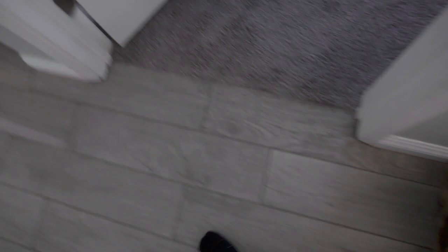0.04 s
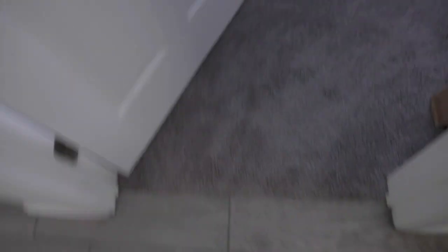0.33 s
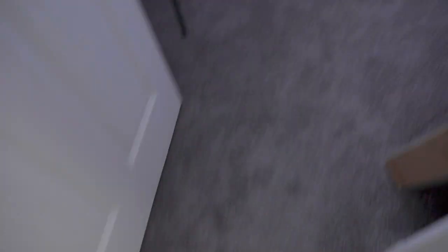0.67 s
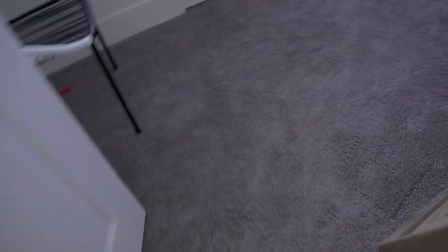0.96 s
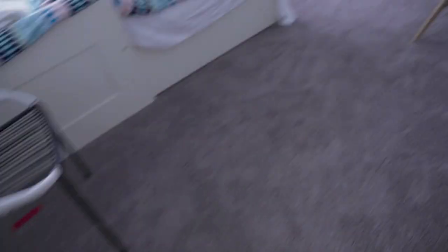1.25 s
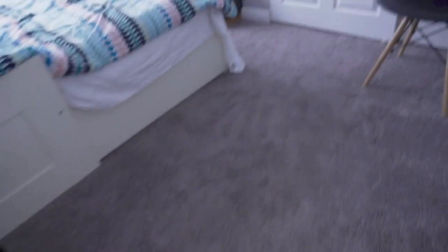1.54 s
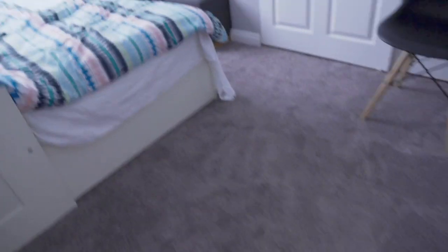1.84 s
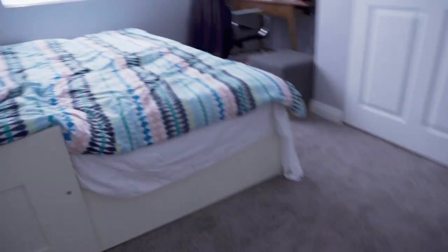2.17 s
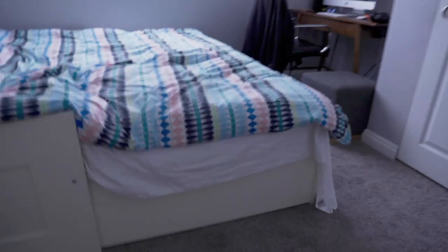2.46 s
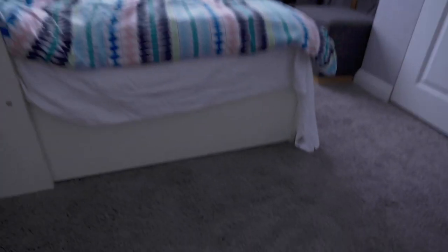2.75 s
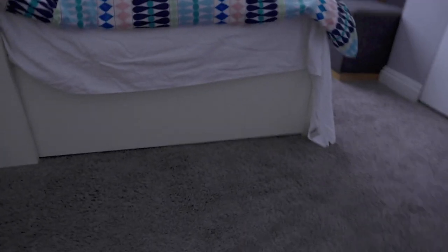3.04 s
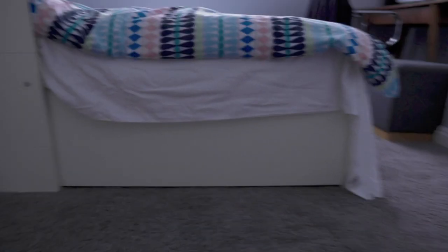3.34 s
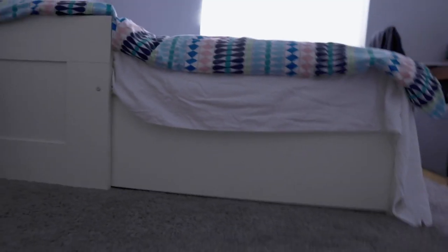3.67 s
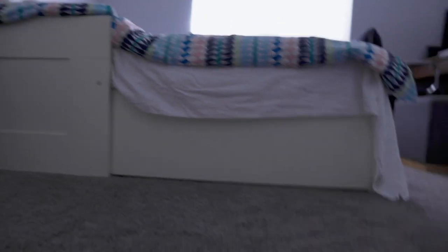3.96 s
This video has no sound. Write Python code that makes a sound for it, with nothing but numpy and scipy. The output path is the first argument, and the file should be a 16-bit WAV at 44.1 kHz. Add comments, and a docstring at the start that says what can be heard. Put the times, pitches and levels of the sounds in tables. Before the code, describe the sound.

Muffled steps thud across a carpeted floor, with rustling clothes, handling bumps and two knocks.

```python
"""A microphone switches on with a soft pop over quiet room tone, and the hand-held camera starts to
rumble, shudder and bump. Cloth slides close by as someone carries it across a carpeted bedroom:
soft footfalls make the floor boom, the grip ticks, clothing swishes and rustles between the steps.
At 1.6 s a sharp knock rings briefly in the room; a louder, brighter one follows at 2.9 s.
The last second is busy with handling ticks and more steps."""
import sys
import numpy as np
from scipy import signal
from scipy.fft import rfft, irfft
from scipy.io import wavfile

SR = 44100
rng = np.random.default_rng(int(sys.argv[2]) if len(sys.argv) > 2 else 0)


def wav_out(sig):
    """Save sig, one row per channel (or a flat mono array), as 16-bit PCM at SR to the path in sys.argv[1]."""
    wavfile.write(sys.argv[1], SR, np.round(np.clip(np.atleast_2d(sig).T, -1, 1) * 32767).astype(np.int16))


N = 176400
TIME = np.arange(N) / SR

# the bedroom's quiet air: pitch_hz, density_db
ROOM_TONE_COLOUR = [(25, 4), (45, 3.5), (65, -4.5), (100, -27), (160, -40), (240, -13.5), (320, -32),
                    (500, -32), (1000, -29), (2100, -32), (3000, -38), (6000, -39.5), (9000, -44),
                    (13000, -49.5), (16000, -51)]
# sway of the carried camera: time_s, level_db
SWAY_LEVEL = [(.08, -30), (.19, -37), (.38, -32), (.9, -36), (1.36, -39), (1.5, -28), (2.14, -33),
              (2.28, -24), (2.51, -32), (2.63, -22), (2.74, -26), (2.86, -18), (3.25, -24), (3.6, -26),
              (3.72, -31), (3.92, -25), (4, -29)]
# its deep rumble: pitch_hz, density_db
RUMBLE_COLOUR = [(11, -1), (15, 0), (22, -8), (33, -12), (45, -15), (55, -20), (70, -36)]
# fader ride of the shudder in the grip: time_s, level_db
SHUDDER_LEVEL = [(.08, -35), (.2, -40.5), (.36, -45), (.85, -55), (1.35, -45.5), (1.6, -35.5), (1.92, -40),
                 (2.05, -47), (2.3, -32), (2.7, -32.5), (3.05, -30.5), (3.26, -38.5), (3.55, -38.5),
                 (4, -30)]
# its low tone: pitch_hz, density_db
SHUDDER_COLOUR = [(40, 1), (58, 4), (72, 6), (85, -17.5), (102, -4.5), (130, -21.5), (165, -24), (205, -22),
                  (245, -24), (290, -27), (400, -33.5), (700, -52.5)]
# the hand bumps the camera: start_s, level_db
BUMPS = [(.072, -37), (.128, -43), (.16, -43.5), (.305, -45.5), (.48, -47), (.532, -40.5), (.76, -49.5),
         (.93, -49.5), (2.15, -46.5), (2.695, -42), (2.955, -42), (3.362, -39.5), (3.622, -41.5),
         (3.83, -45)]
# dull puff of a bump or step: pitch_hz, density_db
THUD_COLOUR = [(50, -18), (110, -4.5), (160, -2.5), (205, -5), (245, 2.5), (320, -28.5), (450, -22),
               (750, -22.5), (1500, -59), (4000, -37)]
# its hollow ring: pitch_hz, level_db, t60_s
HOLLOW_MODES = [(211.7, -5, 0.25), (247.3, -3, 0.22), (293, -5.5, .08)]
# cloth slides near the microphone: peak_s, level_db, rise_s, fall_s
SLIDES = [(.1, -59, 0.01, 0.021), (.28, -62.5, 0.028, 0.036), (.48, -67, 0.093, 0.15),
          (.599, -56.5, 0.014, 0.0097), (.945, -55, 0.037, 0.033), (1.23, -69.5, 0.35, 0.063),
          (1.39, -66.5, 0.048, 0.027), (1.56, -72.5, .04, .24), (2.05, -71, .03, 0.03),
          (2.68, -69, 0.018, 0.076), (3.46, -53.5, 0.081, 0.048), (3.68, -61.5, .14, 0.12),
          (3.87, -62.5, 0.096, 0.085)]
# their bright hiss: pitch_hz, density_db
SLIDE_COLOUR = [(1000, 0), (2800, 2), (3800, 4), (4700, 2), (7500, 4), (10000, 2), (13000, -4),
                (16000, -6.5)]
# feet load the floor: start_s, boom_db, thud_db
STEPS = [(0.231, -23.5, -52.5), (0.55, -21.5, -38), (0.686, -30.5, -42), (1.446, -31, -65),
         (1.584, -15.5, -34), (1.724, -22.5, -56), (2.282, -16.5, -47), (2.532, -26.5, -71),
         (2.805, -22, -47.5), (3.082, -13.5, -36.5), (3.658, -28, -56), (3.769, -24.5, -39),
         (3.887, -30, -45.5)]
# the floor's boom: pitch_hz, level_db, decay_s
FLOOR_MODES = [(49.5, -8.5, 0.15), (64.3, 0.5, .16), (95.3, -6.5, 0.093), (115.8, -15, 0.11)]
# small handling ticks: start_s, bright_db, dull_db
TICKS = [(0.53, -50, -54), (0.54, -45, -48.5), (0.555, -54, -48.5), (0.69, -74, -52), (3.061, -55, -43),
         (3.177, -56, -57), (3.221, -50, -67), (3.253, -46, -60), (3.324, -49.5, -45.5), (3.339, -47, -54),
         (3.362, -39.5, -52), (3.639, -42, -45), (3.771, -66, -38), (3.774, -40, -42.5), (3.884, -43, -43),
         (3.926, -45, -48)]
# a tick's bright edge: pitch_hz, density_db
TICK_BRIGHT_COLOUR = [(2000, 6), (4000, -4), (5500, -3), (7300, -0.5), (10000, -5.5), (16000, -18)]
# a tick's dull body: pitch_hz, density_db
TICK_DULL_COLOUR = [(300, 18), (750, 6.5), (1400, 12), (2000, -2.5), (3000, -4.5), (7000, -65)]
# trouser legs and soles brush past: peak_s, level_db, rise_s, fall_s
SWISHES = [(.94, -50.5, 0.018, 0.025), (1.24, -61, 0.45, 0.053), (1.44, -51.5, 0.081, 0.038),
           (1.545, -49, 0.039, 0.056), (1.755, -52.5, 0.06, 0.042), (1.98, -55, 0.043, 0.049),
           (2.045, -50.5, 0.027, 0.052), (2.22, -60, 0.087, 0.15), (2.675, -48.5, 0.063, 0.033),
           (3.05, -57, 0.57, 0.23), (3.37, -58.5, 0.044, 0.18), (3.82, -60, 0.18, 0.16)]
# their soft, broad tone: pitch_hz, density_db
SWISH_COLOUR = [(200, 7), (400, 8.5), (750, 4.5), (1500, -1), (2200, -3.5), (3200, -9), (5000, -24),
                (9000, -26.5), (16000, -50)]
# fabric zips and soles scuff: peak_s, level_db, rise_s, fall_s, pitch_hz, half_width_octaves
RUSTLES = [(.94, -51.5, 0.031, 0.034, 1300, 0.43), (.945, -71, 0.029, 0.045, 8900, 0.12),
           (1.25, -66.5, 0.08, 0.057, 4170, 0.46), (1.365, -53.5, 0.016, 0.025, 2600, .3),
           (1.405, -60.5, 0.029, 0.047, 5100, 0.29), (1.45, -55.5, 0.019, 0.067, 600, 0.55),
           (1.539, -48.5, 0.02, 0.039, 860, 0.79), (1.68, -67.5, 0.3, 0.11, 3300, 0.63),
           (2.025, -51, 0.015, .04, 1270, 0.37), (2.06, -65, 0.034, 0.053, 3700, 0.43),
           (2.31, -68, 0.015, 0.028, 4120, 0.13), (2.66, -54, 0.064, 0.056, 1090, 0.57),
           (3.05, -67.5, 0.21, 0.15, 4300, 0.24), (3.46, -64, 0.12, .1, 3900, 0.18),
           (3.48, -60, .06, 0.053, 6800, 0.23)]
# sharp knocks: start_s, level_db, most_excited_hz, rolloff_db_per_octave
KNOCKS = [(1.5891, -38, 2500, 8.5), (2.8712, -27, 2380, 0.7)]
# what the knocks ring with: pitch_hz, level_db, t60_s
KNOCK_MODES = [(725, -6, .02), (1276, -7, .083), (1522, -2, .031), (1717, -15, .09), (1895, 2, .023),
               (2058, 6, .013), (2329, -9, .029), (2591, -5, .056), (2794, 4, .012), (2916, 4, .025),
               (3237, -2, .03), (3599, -6, .012), (4221, -16, .03), (4560, -13, .02)]
# a knock's crack: pitch_hz, density_db
CRACK_COLOUR = [(4500, 6), (8000, -10.5), (11000, -33), (16000, -30)]
# the room's answer: pitch_hz, density_db
ECHO_COLOUR = [(400, 8), (1300, 3), (2000, 9.5), (2400, 4), (3000, 5), (3900, -4.5), (4600, -4.5),
               (5400, -7.5), (7000, -18), (14000, -26)]

THUD_RISE_S, SNAP_RISE_S = 0.0013, 0.00013


def from_db(db):
    """Decibels to gain."""
    return 10 ** (np.asarray(db) / 20)


def rms_one(x):
    """Scale to unit power."""
    return x / np.sqrt(np.mean(x ** 2) + 1e-20)


def noise(colour):
    """Unit noise of a given colour, falling away steeply past both ends."""
    hz, db = np.transpose(colour)
    f = np.maximum(np.arange(N // 2 + 1) * SR / N, 1)
    gain = from_db(np.interp(np.log(f), np.log(hz), db))
    skirts = (1 + (hz[0] / f / 1.5) ** 4) * (1 + (f / hz[-1] / 1.5) ** 4)
    return rms_one(irfft(rfft(rng.standard_normal(N)) * gain / skirts, N))


def drift(hz):
    """Smooth random wander of spread 1."""
    f = np.arange(N // 2 + 1) * SR / N
    return rms_one(irfft(rfft(rng.standard_normal(N)) / (1 + (f / hz) ** 2), N))


def ring(push, hz, t60_s):
    """A unit click sets a sine of height 1 ringing."""
    r, w = from_db(-60 / (t60_s * SR)), 2 * np.pi * hz / SR
    return signal.lfilter([0, np.sin(w)], [1, -2 * r * np.cos(w), r * r], push + 1e-18)


def clicks(rows):
    """One impulse for each start_s, level_db."""
    start_s, db = np.transpose(rows)
    return np.bincount((start_s * SR).astype(int), from_db(db), N)[:N]


def bursts(rows, rise_s, t60_s):
    """Envelope of blows: a quick attack, then an even decay."""
    power = 0
    for start_s, db in rows:
        age = np.maximum(TIME - start_s, 0)
        attack = 1 - np.exp(-age / rise_s)
        decay = from_db(db - 60 * np.minimum(age / t60_s, 3))
        power += (attack * decay) ** 2
    return np.sqrt(power)


def swell(peak_s, db, rise_s, fall_s, squareness=2.1):
    """Gain of one stroke, which grows, holds briefly and fades."""
    from_peak = np.abs(TIME - peak_s) / np.where(TIME < peak_s, rise_s, fall_s)
    return from_db(db) * np.exp(-.5 * np.minimum(from_peak, 6) ** squareness)


def room_tone(level_db=-49.5):
    """A steady, bass-heavy bed of air."""
    return from_db(level_db) * noise(ROOM_TONE_COLOUR)


def camera_rumble():
    """The carried camera rumbles as it sways, and shudders in the grip."""
    sway = noise(RUMBLE_COLOUR) * from_db(np.interp(TIME, *np.transpose(SWAY_LEVEL)))
    shudder = noise(SHUDDER_COLOUR) * from_db(np.interp(TIME, *np.transpose(SHUDDER_LEVEL)))
    return sway + shudder


def thuds(rows, puff_t60_s, puff_db=-1, hollow_db=-1.5):
    """Dull blows of hand or foot: a puff of low noise and a short hollow ring."""
    blow = clicks(rows)
    hollow = sum(from_db(hollow_db + db) * ring(blow, hz, t60_s) for hz, db, t60_s in HOLLOW_MODES)
    puff = from_db(puff_db) * noise(THUD_COLOUR) * bursts(rows, THUD_RISE_S, puff_t60_s)
    return hollow + puff


def cloth_rub(strokes, colour, grain_db=1.7, grain_hz=150):
    """Rubbing that swells with each stroke, grainy from catching fibres."""
    power = sum(swell(*stroke) ** 2 for stroke in strokes)
    friction = noise(colour) * from_db(grain_db * drift(grain_hz))
    return np.sqrt(power) * rms_one(friction)


def footsteps(contact_s=0.0024, boom_db=1.5):
    """A cushioned push sets the floor booming, together with a dull thud."""
    steps, age = np.array(STEPS), TIME[:SR // 2]
    cushion = age * np.exp(-2 * age / contact_s)
    push = signal.fftconvolve(clicks(steps[:, :2]), cushion / cushion.sum())[:N]
    floor = 0
    for hz, db, decay_s in FLOOR_MODES:
        damping = np.log(1000) * age / decay_s
        bloom = damping * np.exp(1 - damping)   # builds over a cycle or two, then dies
        floor += from_db(db) * bloom * np.sin(2 * np.pi * hz * age)
    boom = from_db(boom_db) * signal.fftconvolve(push, floor)[:N]
    return boom + thuds(steps[:, [0, 2]], puff_t60_s=0.2)


def handling_ticks():
    """The grip ticks on the camera: a bright edge over a longer, dull body."""
    ticks = np.array(TICKS)
    bright = noise(TICK_BRIGHT_COLOUR) * bursts(ticks[:, :2], SNAP_RISE_S, t60_s=0.019)
    dull = noise(TICK_DULL_COLOUR) * bursts(ticks[:, [0, 2]], SNAP_RISE_S, t60_s=0.036)
    return bright + dull


def rustles():
    """Weave running over weave gives a band of noise for each stroke."""
    out = 0
    for *stroke, hz, octaves in RUSTLES:
        edges_hz = [hz / 2 ** octaves, min(hz * 2 ** octaves, SR / 2 - 1)]
        band = signal.butter(2, edges_hz, "band", fs=SR, output="sos")
        out += swell(*stroke) * rms_one(signal.sosfilt(band, rng.standard_normal(N)))
    return out


def knocks(crack_db=-13.5, echo_db=-15):
    """Each blow gives a short crack, a ringing body and the room's dying answer."""
    hits, body = np.array(KNOCKS)[:, :2], 0
    for k, (hz, mode_db, t60_s) in enumerate(KNOCK_MODES):
        blow = clicks([(start_s, db + mode_db - rolloff * abs(np.log2(hz / excited_hz)))
                       for start_s, db, excited_hz, rolloff in KNOCKS])
        body += (-1) ** k * ring(blow, hz, t60_s)   # modes alternate in polarity
    crack = from_db(crack_db) * noise(CRACK_COLOUR) * bursts(hits, SNAP_RISE_S, t60_s=0.034)
    echo = from_db(echo_db) * noise(ECHO_COLOUR) * bursts(hits, rise_s=0.005, t60_s=0.39)
    return body + crack + echo


def scene():
    """Steps, clothing, knocks, handling and room tone in one mono mix."""
    mix = footsteps()
    mix += cloth_rub(SWISHES, SWISH_COLOUR) + cloth_rub(SLIDES, SLIDE_COLOUR) + rustles()
    mix += knocks()
    mix += camera_rumble() + thuds(BUMPS, puff_t60_s=0.23) + handling_ticks()
    return (mix + room_tone())[None]


def record(dry, switch_on_s=0.0696, fade_in_s=0.004, pop_db=-20.5, pop_fall_s=0.014, cutoff_hz=15700):
    """The microphone switches on with a soft pop; the very top is cut."""
    age = np.maximum(TIME - switch_on_s, 0)
    fade_in = 1 - np.exp(-age / fade_in_s)
    pop = from_db(pop_db) * (age > 0) * np.exp(-age / pop_fall_s)
    high_cut = signal.ellip(10, .2, 80, cutoff_hz, fs=SR, output="sos")
    return signal.sosfilt(high_cut, dry * fade_in + pop)


dry = scene()
out = record(dry)
wav_out(out)
```